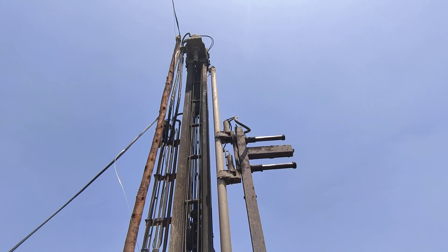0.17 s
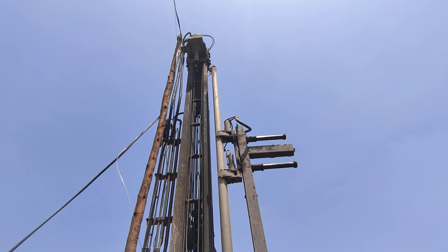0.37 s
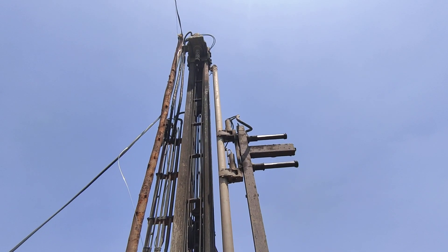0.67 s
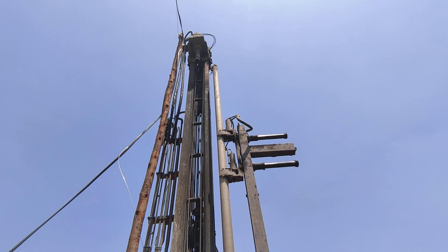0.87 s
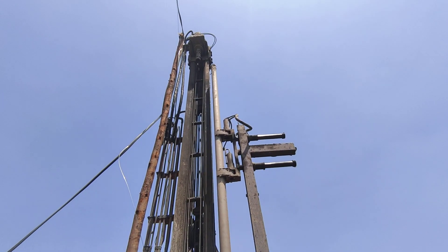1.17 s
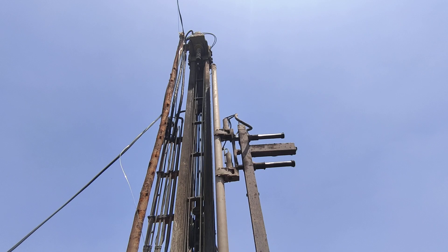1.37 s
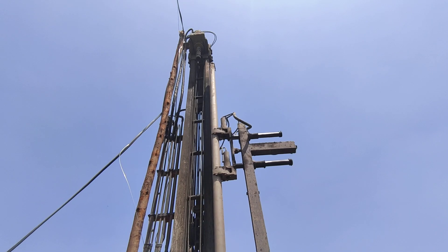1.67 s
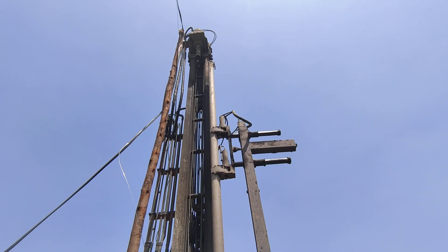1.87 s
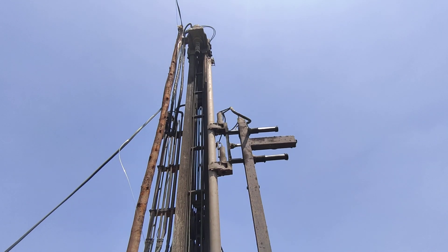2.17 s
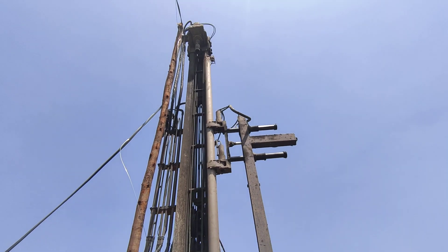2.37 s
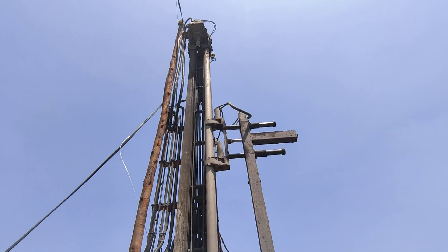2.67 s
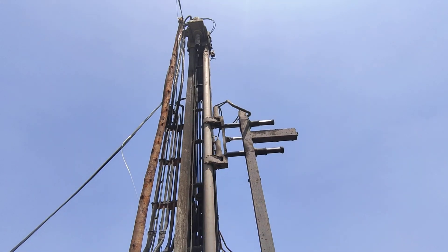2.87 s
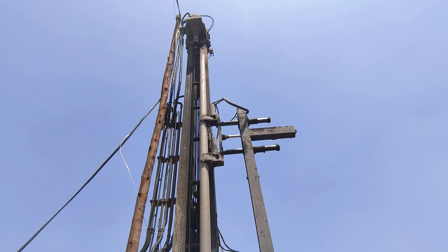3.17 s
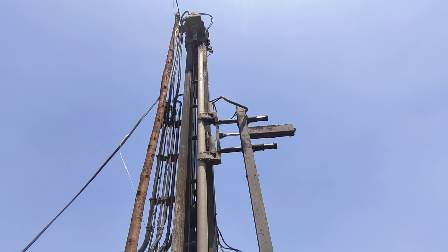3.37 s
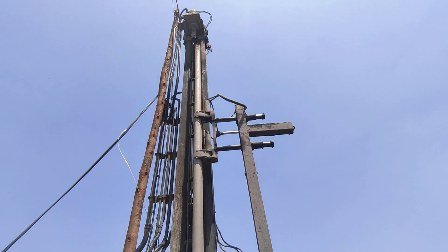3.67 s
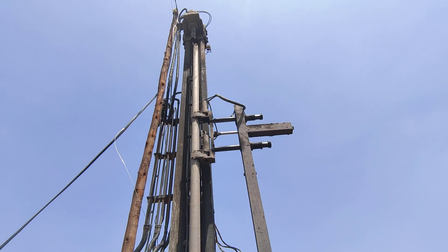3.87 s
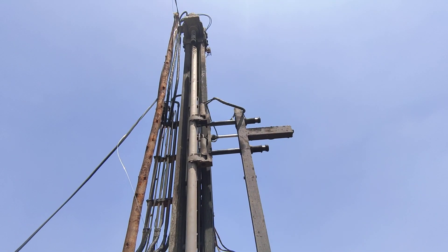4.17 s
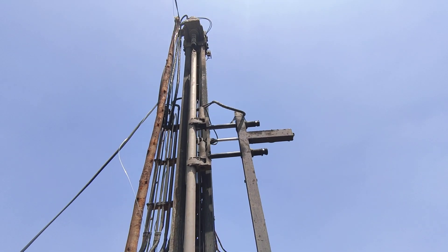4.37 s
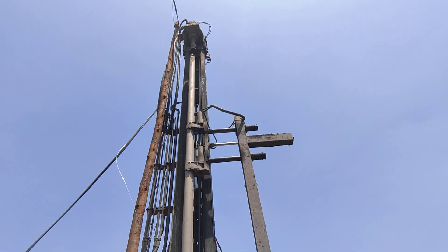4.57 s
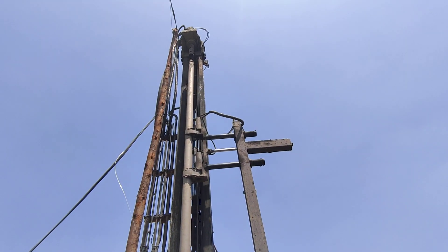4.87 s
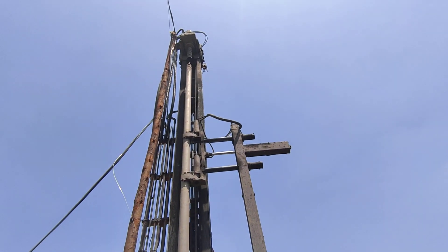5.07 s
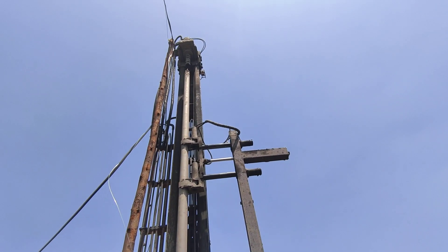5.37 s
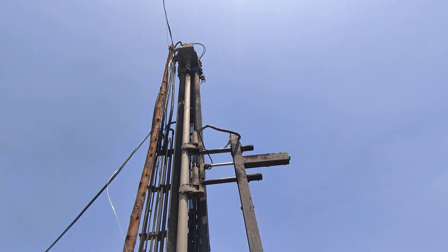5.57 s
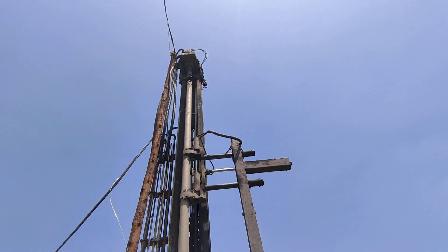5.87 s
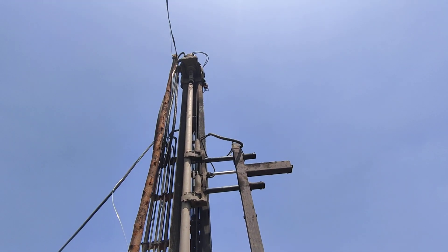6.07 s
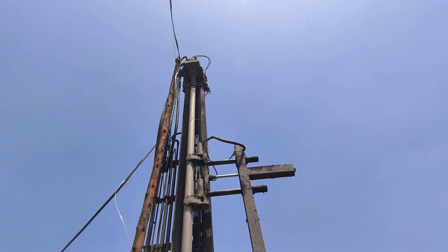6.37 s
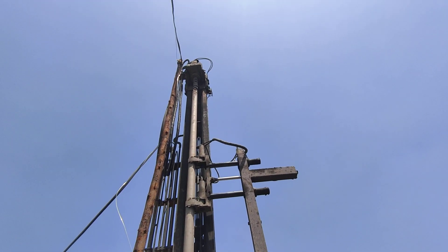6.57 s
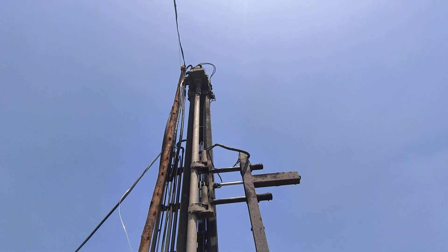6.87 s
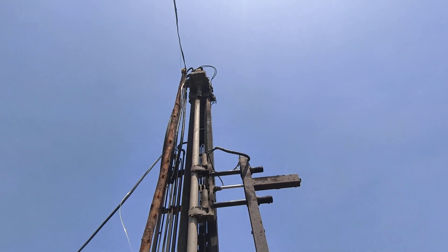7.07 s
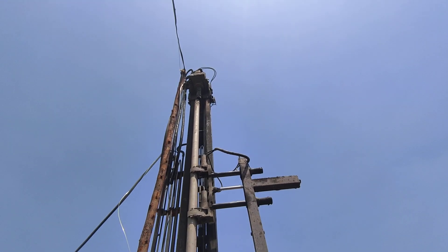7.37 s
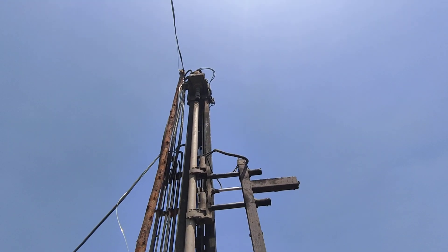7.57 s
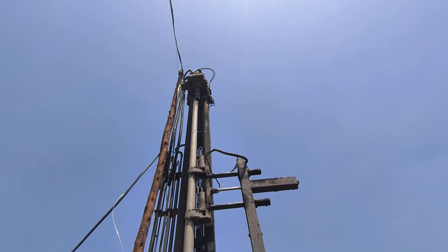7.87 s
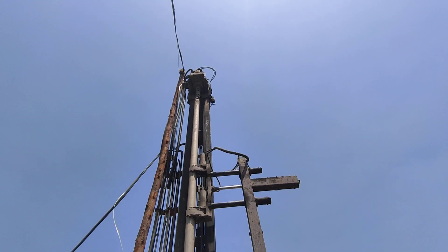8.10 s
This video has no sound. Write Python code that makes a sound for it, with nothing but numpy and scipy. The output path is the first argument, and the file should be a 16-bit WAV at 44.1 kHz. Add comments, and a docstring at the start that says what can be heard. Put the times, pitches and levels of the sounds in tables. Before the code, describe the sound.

A drilling rig's diesel engine drones throughout, heard outdoors from the foot of the mast, with low rumble, light clatter and slight sags under load. A second engine hums steadily beside it. Faint steel ticks dot the opening. At about 2 seconds a valve opens with a dull clunk and a spurt, and hydraulic oil keeps hissing with a thin whistle. A sharp metal click comes at 4.7 seconds, and the exhaust swells briefly. From 5.2 seconds a steel rod scrapes in its guides, with small clicks, a short ring and a thud around 5.5, while the hiss changes tone. A knock at 6.9 seconds is followed by clicks and brief scrapes. From 7.5 seconds the rod grinds with a rough groan sinking in pitch. Around 8 seconds come the loudest scrapes, clicks and a heavy clunk as the hiss drops away.

```python
"""Drilling rig loading a rod

Outdoors, one microphone at the foot of the mast. A diesel drones and sags under load; a second engine
hums beside it. At two seconds a valve opens with a clunk and oil hisses as an arm swings a drill rod
to the mast. Steel parts click, and the rod scrapes in its guides, loudest at the end."""
import sys
import numpy as np
from scipy.fft import rfft, irfft, next_fast_len
from scipy.io import wavfile
from scipy.ndimage import map_coordinates

SR = 44100
rng = np.random.default_rng(int(sys.argv[2]) if len(sys.argv) > 2 else 0)


def to_wav(sig):
    """Store sig (one row per channel, or 1-D mono) as 16-bit WAV at the path in sys.argv[1].

    Samples outside -1..1 are clipped; the rate is SR.
    """
    pcm = np.clip(np.atleast_2d(sig), -1, 1) * 32767
    pcm = np.round(pcm).astype(np.int16)
    wavfile.write(sys.argv[1], SR, pcm.T)  # frames by channels


N = 363119
TIME_S = np.arange(N) / SR


def amp(db):
    """Decibels to gain."""
    return 10 ** (np.asarray(db) / 20)

def unit(x):
    """Scale to rms 1."""
    return x / np.sqrt(np.mean(x ** 2) + 1e-20)

def curves(rows):
    """One value per sample for each column after the time."""
    times, *columns = np.transpose(rows)
    return [np.interp(TIME_S, times, column) for column in columns]

def wobble(rate):
    """A smooth random curve, rate knots a second."""
    return map_coordinates(rng.standard_normal(int(N * rate / SR) + 4), [TIME_S * rate])

def filtered(x, response):
    """Filter x by a response given as a function of frequency."""
    size = next_fast_len(N + SR // 2)
    return irfft(rfft(x, size) * response(np.fft.rfftfreq(size, 1 / SR)), size)[:N]

def coloured(x, spectrum):
    """Shape x by (freq_hz, gain_db) points on a log axis, at rms 1."""
    freq_hz, gain_db = np.transpose(spectrum)
    return unit(filtered(x, lambda hz: amp(np.interp(np.log(hz + 1), np.log(freq_hz), gain_db))))

def white():
    """Fresh white noise."""
    return rng.standard_normal(N)

def resonant(modes):
    """Noise ringing in (pitch_hz, width_hz, gain_db) resonances, at rms 1."""
    def response(hz):
        return sum(amp(db) * 1j * hz * width / (pitch ** 2 - hz ** 2 + 1j * hz * width)
                   for pitch, width, db in modes)
    return unit(filtered(white(), response))

def angle(hz):
    """Phase of something that turns at this rate."""
    return 2 * np.pi * np.cumsum(hz) / SR

def orders(phase, table, waver_db, drift):
    """Multiples of an engine's cycle, each wavering in level and phase."""
    return sum(np.sqrt(2) * amp(db + waver_db * wobble(2.92))
               * np.sin(multiple * phase + drift * wobble(5) + rng.uniform(0, 2 * np.pi))
               for multiple, db in table)

def since(start_s):
    """Seconds since the start, zero before it."""
    return np.maximum(TIME_S - start_s, 0)

def blow(start_s, t60_s, rise_s):
    """Envelope of an impact: a quick rise, then an exponential decay."""
    age = since(start_s)
    return (1 - np.exp(-age / rise_s)) * amp(-60 * age / t60_s)

def ramp(start_s, rise_s):
    """A straight rise from 0 to 1."""
    return np.minimum(since(start_s) / rise_s, 1)

def pushes(table, grip_s=0.022, release_t60_s=0.36):
    """Joint strength of overlapping pushes; each bites quickly, holds and dies away."""
    each = (ramp(start, grip_s) * amp(db - 60 * since(start + length) / release_t60_s)
            for start, length, db in table)
    return np.sqrt(sum(push ** 2 for push in each))


# Echoes off the rig's steel plates: delay_s, gain
PLATE_ECHOES = [(.0041, 0.18), (.0073, -0.2), (.0112, 0.21), (.0167, .12), (.0235, -0.17)]

def reflected(x):
    """Nearby plates send short echoes to the microphone and ripple the spectrum."""
    return filtered(x, lambda hz: 1 + sum(gain * np.exp(-2j * np.pi * hz * delay)
                                          for delay, gain in PLATE_ECHOES))


# Tones of the second engine: firing_multiple, level_db
SECOND_ORDERS = [(2, -48.5), (2.5, -48.5), (4, -47.5), (5, -40.5), (8, -36.5), (12, -43.5), (21, -71.5)]

def second_engine(firing_hz=35.55):
    """A steadier engine beside the diesel; their tones beat against each other."""
    return orders(angle(firing_hz + 0.038 * wobble(1.51)), SECOND_ORDERS, waver_db=-0.3, drift=0.17)


# Course of the exhaust rumble: time_s, relative_db
EXHAUST_LEVELS = [(0.25, -29), (0.6, -30), (1.9, -32), (2.35, -30), (3, -29.5), (4.2, -27.7), (4.6, -28),
                  (4.9, -22), (5.3, -25.5), (5.68, -29.5), (5.88, -25.5), (6.2, -29), (7.15, -25.5),
                  (7.42, -23.5), (7.7, -25.5), (8.2, -25.5)]
# Its spectrum: freq_hz, gain_db
RUMBLE_SPECTRUM = [(15, -54), (28, -29), (42, -15.5), (60, -6), (85, -0.5), (130, -3.5), (170, -5),
                   (250, -27.5), (600, -85)]

def exhaust(trim_db=-3):
    """The diesel's exhaust rumbles low, wavering at random."""
    level_db, = curves(EXHAUST_LEVELS)
    return amp(level_db + trim_db + 0.25 * wobble(4)) * coloured(white(), RUMBLE_SPECTRUM)


# Short low thuds as steel clunks and the rod seats: start_s, length_s, level_db
CASING_THUDS = [(1.965, 0.22, -28.5), (4.66, 0.13, -28), (5.5, .1, -30), (8.06, .1, -22)]
# Roar of the engine casing: freq_hz, gain_db
CASING_SPECTRUM = [(80, -38.5), (150, -7.5), (200, 0.5), (300, 2), (340, -3), (380, -10), (500, -20),
                   (900, -58)]

def casing(firing, steady_db=-32):
    """The casing's roar pulses with the firings and swells in short low thuds."""
    level = np.hypot(amp(steady_db + 0.5 * wobble(4)), pushes(CASING_THUDS))
    return level * coloured(firing * white(), CASING_SPECTRUM)


def gear_hum(shaft_hz, order=19, gear_db=-41, panel_hz=429, width_hz=2.8, panel_db=-30.5):
    """A gear tone; near a panel's resonance it swells and turns hollow with a weak third harmonic."""
    phase = order * angle(shaft_hz) + 0.15 * wobble(4.6)
    detuning = (order * shaft_hz - panel_hz) / width_hz
    panel = ramp(0, rise_s=0.06) * amp(panel_db) / (1 + detuning ** 2)
    gear = amp(gear_db + 0.62 * wobble(3))
    return np.sqrt(2) * ((gear + panel) * np.sin(phase) + panel * amp(-15.5) * np.sin(3 * phase))


# The diesel's speed and load: time_s, shaft_hz, load_db
DIESEL_RUN = [(0, 22.38, -31), (0.22, 22.51, -44), (0.62, 22.02, -42), (1.2, 21.81, -33), (1.8, 21.86, -31),
              (2.33, 21.44, -29.5), (3.05, 21.84, -29.5), (3.75, 21.87, -37), (4.8, 21.94, -35.5),
              (5.25, 21.75, -30.5), (5.9, 22.05, -37.9), (6.55, 21.84, -37.8), (7.3, 21.8, -34),
              (7.75, 21.6, -31.0)]
# Its steady tones: shaft_multiple, level_db
STEADY_ORDERS = [(2, -51.5), (4, -51.5), (5.5, -50.5), (6, -37), (9, -46), (11, -51.5), (12, -41),
                 (13, -45.5), (15, -52), (18, -56), (20, -46.5), (25, -53), (35, -69), (38, -52.5)]
# Tones that grow with load: shaft_multiple, relative_db
LOAD_ORDERS = [(5, -5), (10, -2)]
# Its clatter: freq_hz, gain_db
CLATTER_SPECTRUM = [(150, -36), (400, 4), (650, 4.5), (850, 0.5), (1050, -7), (1700, -7.5), (2300, -15.5),
                    (3200, -26), (4000, -34.5), (5600, -37.5), (6500, -23), (7600, -28.5)]

def diesel(load_threshold_db=-41.5, clatter_db=-40.5):
    """The main engine: exhaust tones over rumble and roar, with clatter pulsing at each firing."""
    shaft_hz, load_db = curves(DIESEL_RUN)
    shaft = angle(shaft_hz)
    load = amp(2.5) * np.maximum(amp(load_db) - amp(load_threshold_db), 0)
    tones = orders(shaft, STEADY_ORDERS, waver_db=2.0, drift=0.091)
    tones += load * orders(shaft, LOAD_ORDERS, waver_db=2.2, drift=0.1)
    # two firings a turn; unequal cylinders repeat every second turn
    firing = 1 + 0.076 * np.cos(2 * shaft) + 0.034 * np.cos(shaft / 2) + 0.057 * np.cos(5 * shaft)
    drone = tones + exhaust() + casing(firing) + gear_hum(shaft_hz)
    return drone + amp(clatter_db) * reflected(coloured(firing * white(), CLATTER_SPECTRUM))


# Moves of the oil valve: start_s, flow_db, travel_s
OIL_VALVE_MOVES = [(1.925, -46.5, 0.03), (2.16, -43, 0.23), (4.4, -42.5, 0.36), (5.36, -43.5, 0.14),
                   (6.8, -42.5, 0.25), (7.41, -48.5, 0.085), (7.911, -44.5, 0.038), (8.129, -58, .06)]

def oil_flow(spurt_db=9, stall_s=7.487, stall_db=-9.5):
    """The valve's first opening (0 to 1) and the relative flow in dB from setting to setting."""
    open_s, flow_db, opening_s = OIL_VALVE_MOVES[0]
    for start_s, db, travel_s in OIL_VALVE_MOVES[1:]:
        flow_db = flow_db + (db - flow_db) * ramp(start_s, travel_s)
    spurt = blow(open_s, t60_s=0.27, rise_s=0.01)  # pent-up pressure escapes
    stall = np.exp(-((TIME_S - stall_s) / 0.025) ** 2)  # the valve throttles back
    return ramp(open_s, opening_s), flow_db + spurt_db * spurt + stall_db * stall


# Hiss of the oil: freq_hz, gain_db
OIL_SPECTRUM = [(200, -27.5), (450, 9), (880, 11), (1050, -1), (1400, 1.5), (2300, -2), (2900, -7),
                (3350, -11), (3700, -17.5), (5600, -12.5), (6050, -6.5), (6900, 1.5), (7600, -3)]
# Oil line resonances while the arm swings: pitch_hz, width_hz, gain_db
SWINGING_MODES = [(1803, 61, 3.5), (2327, 26, -2.5), (2360, 19, -3), (2626, 81, -5.5), (3160, 200, -11.5),
                  (4530, 59, -7.5), (4960, 18, -5), (5310, 41, -7.5), (5990, 42, -3.5), (7030, 73, -1.5)]
# The same lines as it presses the rod against the mast: pitch_hz, width_hz, gain_db
PRESSED_MODES = [(950, 40, 10.5), (1266, 48, 7), (2080, 27, 3), (3113, 72, -0.5), (5330, 160, -11.5),
                 (6000, 40, -8), (6260, 35, -10), (7070, 70, -6)]
# The valve's whistle band: pitch_hz, width_hz, gain_db
WHISTLE_MODES = [(3212, 86, -1.5), (3353, 160, 0)]

def hydraulics():
    """Oil cavitates in the open valve and rings the steel lines, which change note under load."""
    opening, flow_db = oil_flow()
    pressed = ramp(5.3, rise_s=0.27)
    fizz = white() * amp(0.9 * wobble(300))
    hiss = amp(8.5 - 1.2 * pressed) * reflected(coloured(fizz, OIL_SPECTRUM))
    lines = np.sqrt(1 - pressed) * amp(-4.5) * resonant(SWINGING_MODES)
    lines += np.sqrt(pressed) * amp(-0.5) * resonant(PRESSED_MODES)
    flow = amp(flow_db + 0.36 * wobble(16))
    whistle = amp(flow_db * 0.61 - 26.5) * resonant(WHISTLE_MODES)
    return opening * (flow * (hiss + lines) + whistle)


# Sharp steel contacts: start_s, tick_db, body_db, t60_s
STEEL_CLICKS = [(0.035, -54, -42, .16), (0.12, -58.5, -44, 0.16), (0.3, -48, -51, 0.14),
                (0.966, -43, -36, 0.16), (1.145, -50, -41, 0.16), (1.183, -54.5, -48, 0.19),
                (1.964, -41.5, -27, 0.15), (2.056, -39, -35.5, 0.14), (4.738, -21, -26, .035),
                (5.17, -52, -33, 0.17), (5.232, -46, -33.5, 0.2), (5.271, -46, -36, .15),
                (5.335, -47.5, -36.5, .18), (6.892, -52, -32, 0.11), (7.018, -30, -32, 0.08),
                (7.205, -48, -38, 0.13), (7.932, -37.5, -45, 0.12), (7.969, -35, -25, 0.11),
                (8.065, -31, -32.5, 0.11), (8.099, -27, -25.5, 0.11), (8.117, -34, -18.5, .09)]
# Their treble tick: freq_hz, gain_db
TICK_SPECTRUM = [(1500, -38.5), (3500, -17.5), (5000, -9), (6300, 4), (7600, -0.5)]
# Their body: freq_hz, gain_db
BODY_SPECTRUM = [(200, -19.5), (700, 3), (1300, 3.5), (2100, -1.5), (3000, -10), (4500, -22.5), (7500, -45)]

def clicks():
    """Small steel parts meet, each with a bright tick over a lower body."""
    tick, body = coloured(white(), TICK_SPECTRUM), coloured(white(), BODY_SPECTRUM)
    return reflected(sum(blow(start, t60, rise_s=0.00085) * (amp(tick_db) * tick + amp(body_db) * body)
                         for start, tick_db, body_db, t60 in STEEL_CLICKS))


# Taps on steel parts: start_s, pitch_hz, level_db, t60_s
RINGING_TAPS = [(.967, 4965, -45.5, 0.12), (.969, 6080, -46.5, 0.089), (4.74, 2025, -27, 0.07),
                (4.74, 2680, -35, 0.078), (5.17, 1357, -35.5, 0.35), (5.17, 2205, -41, 0.33),
                (5.26, 1427, -40, .2), (5.452, 1420, -28.5, 0.38)]

def rings(jitter_hz=25):
    """Tapped steel rings briefly with a rough pitch."""
    return sum(amp(db) * blow(start, t60, rise_s=0.0012) * np.sin(angle(hz + jitter_hz * wobble(200)))
               for start, hz, db, t60 in RINGING_TAPS)


# Heavy blows on the frame: start_s, level_db, t60_s
FRAME_BLOWS = [(1.969, -26, 0.55), (5.512, -30, 0.5), (6.893, -23, 0.25), (8.109, -22.5, 0.39)]
# The struck frame: freq_hz, gain_db
FRAME_SPECTRUM = [(50, -18.5), (130, -5.5), (270, -5.5), (600, 3.5), (1000, -8), (2000, -31.5),
                  (5000, -48.5)]

def clunks():
    """The frame answers each blow with a dull burst of noise."""
    level = sum(amp(db) * blow(start, t60, rise_s=0.0045) for start, db, t60 in FRAME_BLOWS)
    return reflected(level * coloured(white(), FRAME_SPECTRUM))


def guide_groan(hardness, start_s=7.52, start_hz=696, end_hz=534, sink_s=0.25, level_db=-26):
    """The guide groans, sinking in pitch as the rod seats."""
    pitch_hz = end_hz + (start_hz - end_hz) * np.exp(-since(start_s) / sink_s)
    phase = angle(pitch_hz + 32 * wobble(160))  # uneven slips shake the pitch
    catching = amp(level_db + 2.9 * wobble(90) + 2.5 * wobble(14))  # it catches and lets go
    tone = np.sin(phase) + amp(-10) * np.sin(2 * phase)
    return ramp(start_s, rise_s=0.025) * hardness ** 0.27 * catching * tone


# Strokes of the rod in its guides: start_s, length_s, pressure_db
ROD_STROKES = [(5.2, 0.35, -42), (5.481, .085, -28.5), (5.622, 0.93, -40.5), (6.073, .39, -39.5),
               (6.883, .04, -33.5), (7.132, .045, -29), (7.369, .13, -41), (7.488, 0.49, -33),
               (7.54, 0.029, -32.5), (7.952, 0.09, -27), (8.06, 0.078, -23), (8.16, .08, -24)]
# Sliding steel: freq_hz, gain_db
SCRAPE_SPECTRUM = [(120, -31.5), (350, 0), (650, 6.5), (900, 2), (1400, -1), (1900, -10), (2600, -19.5),
                   (4000, -31.5), (7500, -44.5)]
# The harsher grinding of hard contact: freq_hz, gain_db
GRIND_SPECTRUM = [(400, -19), (900, 2), (1800, -0.5), (2400, -15.5), (3300, -13.5), (4200, -45.5),
                  (7500, -47)]

def rod():
    """Sliding steel catches in small slips; pressed harder, it grinds and shakes the engine casing."""
    pressure = pushes(ROD_STROKES) * amp(0.7 * wobble(16))
    hardness = pressure / amp(max(db for _, _, db in ROD_STROKES))
    slips = amp(1.5 * wobble(180))
    scrape = pressure * amp(2.5) * coloured(white() * slips, SCRAPE_SPECTRUM)
    # grinding grows faster than the scrape, so hard contact is brighter
    grind = pressure * hardness * amp(-1) * coloured(white() * slips, GRIND_SPECTRUM)
    shudder = pressure * hardness * amp(0.5) * coloured(white(), CASING_SPECTRUM)
    return reflected(scrape + grind) + shudder + guide_groan(hardness)


def scene():
    """All the machinery in mono, heard from the foot of the mast."""
    return (second_engine() + diesel() + hydraulics() + clicks() + rings() + clunks() + rod())[None]

def record(dry, top_hz=7590):
    """The recorder keeps nothing above its band limit."""
    return filtered(dry[0], lambda hz: hz < top_hz)[None]


dry = scene()
out = record(dry)
to_wav(out)
```